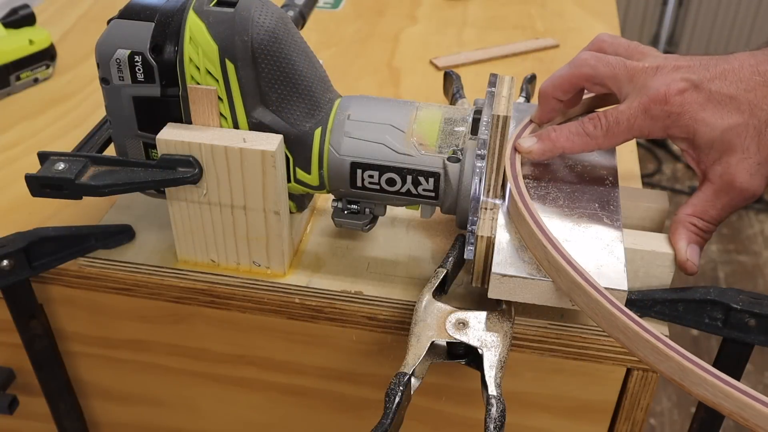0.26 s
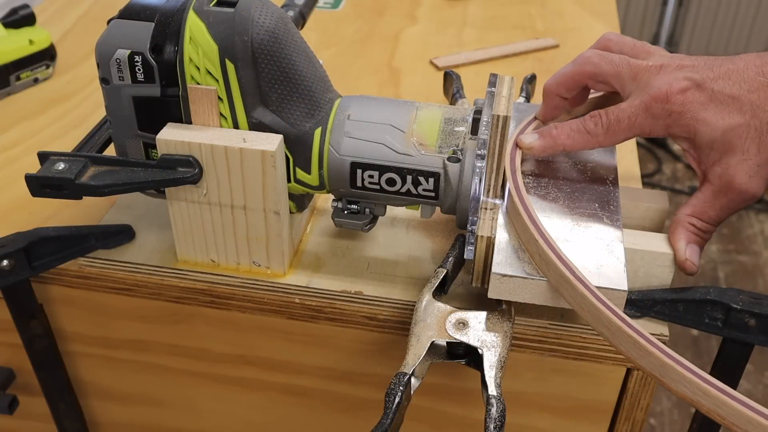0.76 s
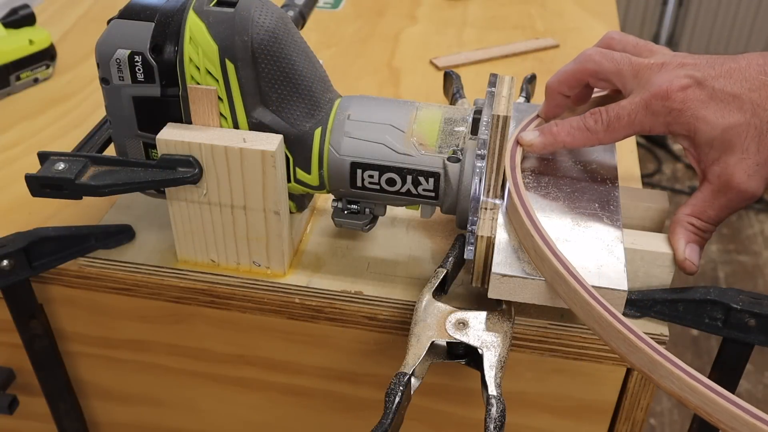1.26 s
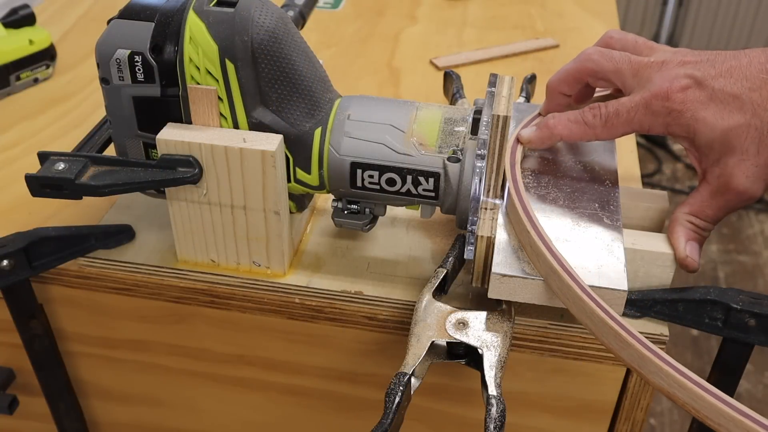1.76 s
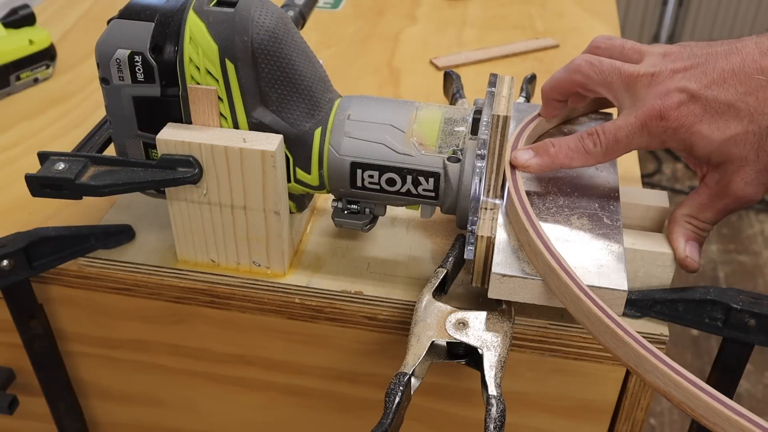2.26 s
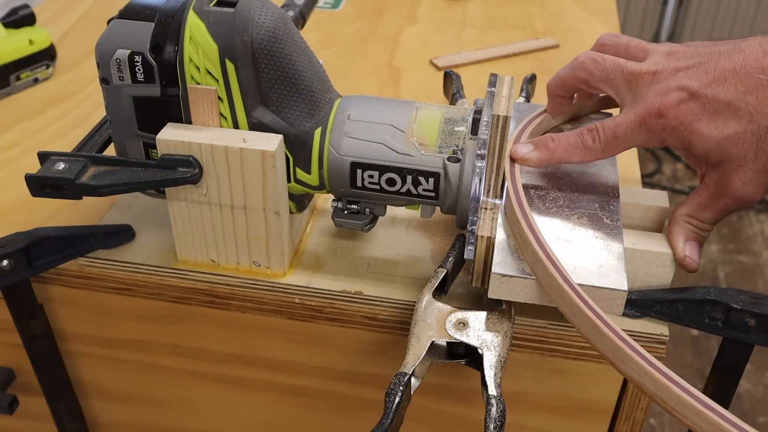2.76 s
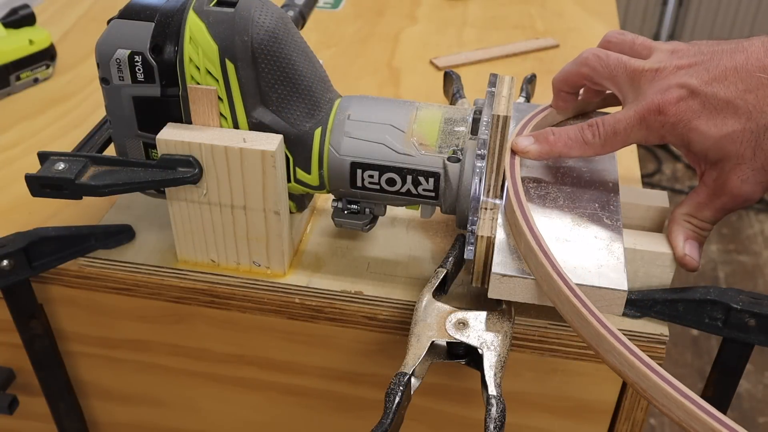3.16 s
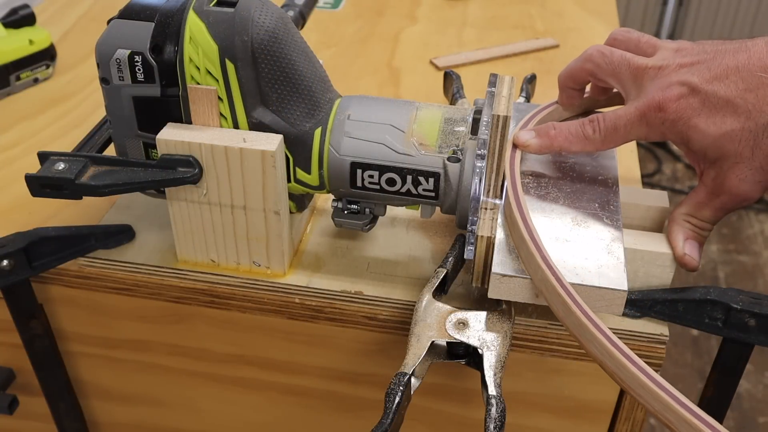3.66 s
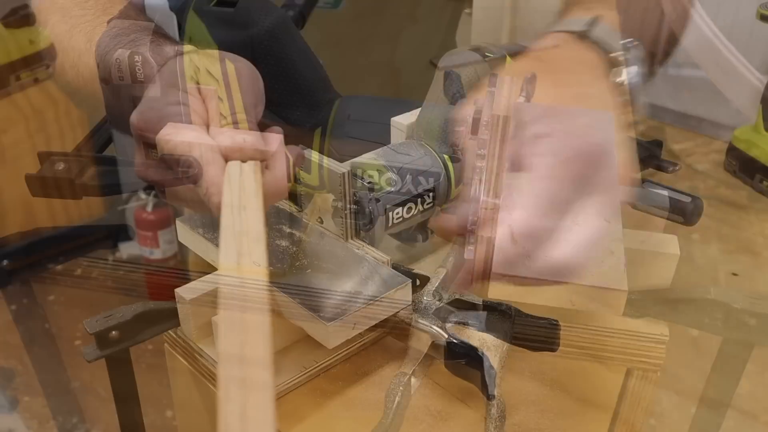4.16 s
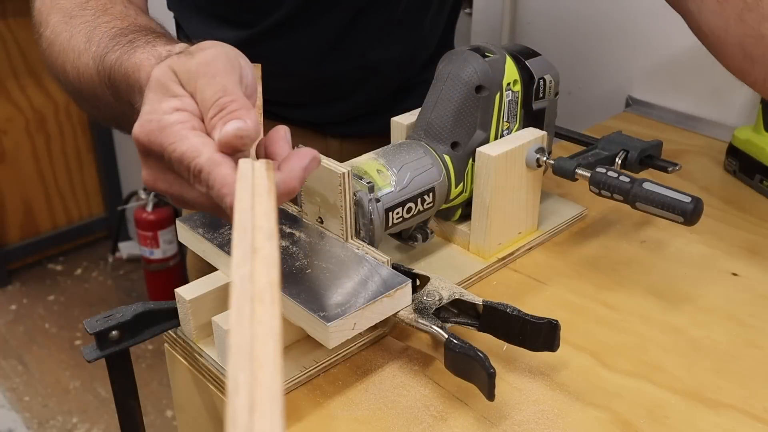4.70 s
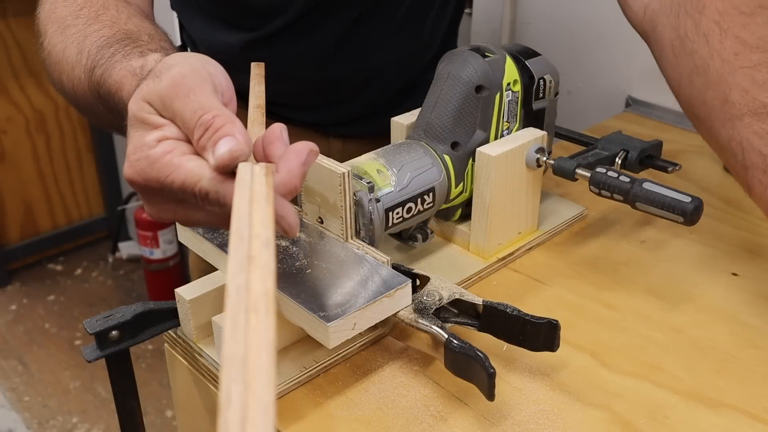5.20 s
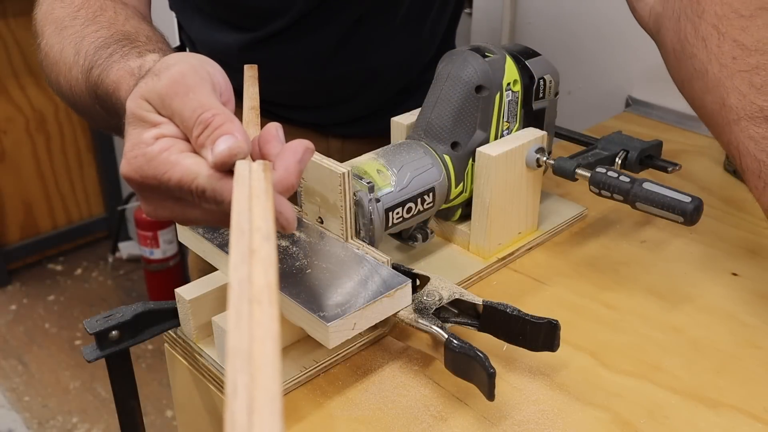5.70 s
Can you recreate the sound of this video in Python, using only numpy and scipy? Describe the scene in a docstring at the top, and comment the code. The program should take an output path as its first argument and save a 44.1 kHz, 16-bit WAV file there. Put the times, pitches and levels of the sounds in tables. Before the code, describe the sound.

High, steady whine and hum of a trim router rasping through wood, fading away to a quiet room where wooden strips briefly rub together.

```python
"""Trim router cutting a wooden strip.

A clamped cordless router runs at about 430 turns a second while a strip is fed past its bit. The bit strikes
once a turn, the motor whines at twelve times the speed, cooling air hisses from the vents. After the strip
leaves, the scene changes: the router fades out into quiet workshop air, where a hand slides two strips
together."""
import sys
import numpy as np
from scipy import signal
from scipy.fft import rfft, irfft, next_fast_len
from scipy.io import wavfile

SR = 44100
rng = np.random.default_rng(int(sys.argv[2]) if len(sys.argv) > 2 else 0)


def bounce(signal):
    """Save signal as a 16-bit WAV file at the path given by the first command-line argument."""
    frames = np.transpose(np.atleast_2d(signal))
    limited = np.clip(frames, -1, 1)
    pcm = np.round(limited * 32767).astype(np.int16)
    wavfile.write(sys.argv[1], SR, pcm)


N = 261947
T = np.arange(N) / SR
PULLS_PER_TURN = 12

# whine pitch, sagging as the strip is pressed in: (time [s], pitch [Hz])
WHINE_PITCH = [(0.03, 5145), (0.31, 5171), (0.8, 5154), (0.98, 5185), (1.61, 5146), (1.79, 5208),
               (2.17, 5226), (2.46, 5150), (2.91, 5148), (3.04, 5097), (3.1, 5141), (3.82, 5149),
               (4.09, 5240), (4.2, 5225)]
# force of the bit's blow, heard as the once-a-turn hum: (time [s], level [dB])
BLOW_FORCE = [(0.03, -22), (0.22, -25.5), (0.6, -22), (0.65, -25), (0.72, -23), (1.01, -24.5),
              (1.07, -23.5), (1.56, -22), (1.71, -27), (2.2, -27), (2.28, -20), (2.34, -24.5), (2.39, -21),
              (2.82, -23.5), (3.03, -20.5), (3.09, -22), (3.66, -23), (3.93, -25.5)]
# strip resonance, shifting as it bends, and depth of cut: (time [s], resonance [Hz], rasp level [dB])
STRIP_CUT = [(0.03, 2060, -41.5), (0.71, 2280, -42.5), (0.8, 2150, -36), (0.94, 2560, -39.5),
             (1.03, 2060, -41.5), (1.2, 2500, -35.5), (1.46, 2500, -39.5), (1.78, 1850, -51),
             (2.18, 2100, -60), (2.27, 1800, -34), (2.31, 2210, -54), (2.38, 1800, -37),
             (2.42, 2320, -43.5), (2.67, 2700, -40), (3.27, 1820, -51), (3.33, 2400, -52),
             (3.71, 2490, -46), (3.93, 1690, -38)]
# rush of air and motor tones: (time [s], level [dB])
RUSH_LEVEL = [(0.03, -40.5), (0.23, -39), (1.71, -40), (2.24, -38), (3.04, -41), (3.69, -41), (3.9, -42.5)]


def router(free_hz=436.5, loaded_hz=427, tear_load=0.41, cut_end_s=3.96, fade_s=(3.942, 4.375),
           hum_db=-0.35, idle_db=-31.5, rasp_db=-1.5, chips_db=-10, rush_db=3, air_db=1.55):
    """One shaft drives all parts; its sag in speed sets the load. Cutting stops as the strip leaves."""
    speed_hz = curves(WHINE_PITCH)[0] / PULLS_PER_TURN
    median_hz = np.median(speed_hz)
    angle = 2 * np.pi * np.cumsum(speed_hz) / SR + .005 * drift(32)
    load = np.clip((free_hz - speed_hz) / (free_hz - loaded_hz), 0, 1)
    in_wood = np.clip((cut_end_s - T) / 0.013 + .5, 0, 1)
    force_db, = curves(BLOW_FORCE)
    resonance_hz, bite_db = curves(STRIP_CUT)
    bite = undb(bite_db)
    rush = undb(rush_db + curves(RUSH_LEVEL)[0])
    hum_gain = in_wood * undb(hum_db + force_db) + (1 - in_wood) * undb(idle_db)
    running = hum_gain * tone(angle, 1, rough=0.076, waver_hz=6.7)
    running += whine(angle) + housing(angle, load)
    running += rush * (motor(angle, speed_hz) + undb(air_db) * cooling_air())
    tearing = bite * (undb(rasp_db) * rasp(angle, median_hz, resonance_hz) + undb(chips_db) * chips(angle))
    tearing += np.sqrt(bite * rush) * buzz(angle, median_hz)
    # under light load the bit knocks but hardly tears
    cutting = knock(angle, force_db) + np.tanh(load / tear_load) * tearing
    fade = np.interp(T, fade_s, (1, 0)) ** 1.08
    return fade * (running + in_wood * cutting + grabs(angle, median_hz))


# third harmonic of the hum: (time [s], level [dB])
THIRD_LEVEL = [(0.03, -38), (0.27, -45), (0.54, -40), (2.2, -40), (2.26, -31), (2.29, -35), (3.41, -40),
               (3.74, -39.5), (3.9, -48)]


def knock(angle, force_db):
    """The bit shoves the strip once a turn: harmonics 2 and 3, the second growing with the force."""
    second_db = -40.5 + 0.91 * (force_db - np.median(force_db))
    third_db = 0.6 + curves(THIRD_LEVEL)[0]
    return sum(undb(db) * tone(angle, order, rough=0.22, waver_hz=8, lag_rad=quadrature())
               for order, db in ((2, second_db), (3, third_db)))


def rasp(angle, shaft_hz, resonance_hz, width_hz=250, floor=.22):
    """The strip's resonance lifts the nearest of harmonics 4-6; the others stay faint."""
    orders = np.arange(4, 7)
    gains = np.array([k * (floor + 1 / (1 + ((k * shaft_hz - resonance_hz) / width_hz) ** 2))
                      for k in orders])
    gains /= np.linalg.norm(gains, axis=0)
    return sum(gain * tone(angle, k, rough=0.32, waver_hz=9, lag_rad=quadrature())
               for k, gain in zip(orders, gains))


# upper overtones of the blow: (frequency [Hz], level [dB])
BUZZ_SPECTRUM = [(3400, -13.5), (3900, -14), (4300, -16), (4700, -14), (5600, -21), (6000, -18.5),
                 (6450, -18), (8700, -16), (9900, -26), (12500, -31), (15500, -37)]


def buzz(angle, shaft_hz, grain_db=2.5, grain_hz=4):
    """One sharp blow a turn makes a comb of overtones that swell and sink as the grain passes."""
    out = 0
    for order in np.r_[8:12, 13:35]:  # 12 belongs to the whine
        grain = unit_rms(undb(grain_db * drift(grain_hz)))
        lag_rad = quadrature() + rng.standard_normal()
        overtone = tone(angle, order, rough=0.82, waver_hz=11, lag_rad=lag_rad)
        out += gain_at(order * shaft_hz, BUZZ_SPECTRUM) * grain * overtone
    return out


def chips(angle, sharpness=1.8, scatter_db=0.5, tilt_db_per_oct=-2.5):
    """Fibres tear in one uneven noise burst per turn."""
    bursts = np.exp(sharpness * (np.cos(angle) - 1)) * undb(scatter_db * drift(150))
    return colour(bursts * rng.standard_normal(N), AIR_SPECTRUM, tilt_db_per_oct=tilt_db_per_oct)


# the bit grabs a thick chip: (time [s], rise [s], fall [s], level [dB])
CHIP_GRABS = [(2.272, 0.04, 0.0088, -32.5), (3.025, 0.022, 0.016, -38), (3.945, 0.027, 0.0048, -38)]
# overtones of a grab: (frequency [Hz], level [dB])
GRAB_SPECTRUM = [(860, -9), (1300, 7), (1720, 5.5), (2150, 9), (3000, -4.5), (4500, -26), (8000, -17),
                 (9500, -19)]


def grabs(angle, shaft_hz, splinter_db=-9, snap_db=-12, snap_lead_s=0.0065, snap_s=.0035):
    """A thick chip hardens the blows: a splintery bark, with a fibre snapping just before its peak."""
    bark = sum(gain_at(k * shaft_hz, GRAB_SPECTRUM) * tone(angle, k, rough=0.62, waver_hz=60)
               for k in range(2, 23))
    bark = unit_rms(bark) + undb(splinter_db) * chips(angle, tilt_db_per_oct=1.5)
    snap = undb(snap_db) * colour(rng.standard_normal(N), AIR_SPECTRUM, tilt_db_per_oct=14)
    out = 0
    for at_s, rise_s, fall_s, db in CHIP_GRABS:
        out += undb(db) * swell(at_s, rise_s, fall_s) * bark
        out += undb(db) * swell(at_s - snap_lead_s, snap_s, snap_s) * snap
    return out


# motor whine: (time [s], level [dB])
WHINE_LEVEL = [(0.03, -38.5), (0.33, -40.5), (0.54, -36), (1.79, -41.5), (1.83, -46.5), (2.06, -40),
               (2.89, -39.5), (2.95, -47), (2.97, -40), (3.24, -42.5), (3.8, -39), (3.93, -45.5)]
# moments of heavy load that dip the whine: (time [s], depth [0-1])
WHINE_DIPS = [(1.48, .45), (2.61, 0.7), (2.755, 0.7), (3.04, .7), (3.17, .45), (3.27, 0.5), (3.35, 0.8),
              (3.45, 0.8)]


def whine(angle, gain_db=2.5, dip_s=0.011, sideband_db=-18):
    """The rotor's magnetic pull whines, dips briefly and grows a fluttering sideband when strong."""
    level = undb(gain_db + curves(WHINE_LEVEL)[0])
    dips = np.prod([1 - depth * swell(at_s, dip_s, dip_s) for at_s, depth in WHINE_DIPS], axis=0)
    share = undb(sideband_db) * (level / np.median(level)) ** 1.4
    sideband = share * tone(angle, PULLS_PER_TURN + 1, rough=0.97, waver_hz=22)
    pull = tone(angle, PULLS_PER_TURN, rough=0.15, waver_hz=12, lag_rad=np.pi / 2)
    return level * (dips * pull + sideband)


def housing(angle, load, base_db=-48, load_db=4, build_db_per_s=1.75, peak_s=2.66):
    """The housing sings at harmonic 7, near its resonance; louder under load and towards peak_s."""
    build_db = build_db_per_s * (peak_s - np.abs(T - peak_s))
    return undb(base_db + load_db * load + build_db) * tone(angle, 7, rough=0.41, waver_hz=12)


# tones of the turning parts: (order [x shaft speed], level [dB], slope with speed [dB/Hz])
MOTOR_TONES = [(3, -17.5, 2), (4, -16.5, 0.7), (9, -19, -1), (10, -18, 0.7), (14.13, -27, 2.5),
               (21, -24.5, 1.2), (24, -44, -1)]


def motor(angle, speed_hz):
    """Bearings and fan blades sing at fixed multiples of the speed; their levels shift with it."""
    extra_hz = speed_hz - np.median(speed_hz)
    return sum(undb(db + db_per_hz * extra_hz) * tone(angle, order, rough=0.25, waver_hz=9)
               for order, db, db_per_hz in MOTOR_TONES)


# air through fan and vents: (frequency [Hz], density [dB])
AIR_SPECTRUM = [(60, -29), (125, -23), (260, -12), (520, -1.5), (900, 4), (1500, -3), (2000, 0.5),
                (2400, -3), (4200, 0.5), (6600, -7), (8400, -6), (10300, -17), (12500, -17.5), (15500, -28)]
# housing resonances: (frequency [Hz], width [Hz], level [dB])
HOUSING_MODES = [(183, 13.7, -5), (3116, 256, 4.5), (3443, 200, 6.5)]


def cooling_air(flutter_db=0.97):
    """Cooling air rushes through the resonant housing."""
    hiss = colour(rng.standard_normal(N), AIR_SPECTRUM, HOUSING_MODES)
    return hiss * undb(flutter_db * drift(41))


# wood rubbing on wood: (time [s], rise [s], fall [s], level [dB], tilt [dB/octave])
RUBS = [(4.585, 0.027, .03, -55.5, 11), (5.457, 0.013, 0.014, -41, -1.5), (5.64, .012, .015, -63, 2)]
# friction noise: (frequency [Hz], density [dB])
RUB_SPECTRUM = [(300, -10), (700, -3), (1400, -3), (2200, -5), (3500, -5), (5500, -11), (8500, -16),
                (12000, -29), (15500, -32)]
# strip resonances: (frequency [Hz], width [Hz], level [dB])
STRIP_MODES = [(1060, 42, 11), (2520, 80, -2), (3100, 56, -5), (3450, 80, -2)]
# thin squeaks: (time [s], half length [s], pitch [Hz], level [dB])
RUB_SQUEAKS = [(4.59, 0.029, 3030, -59.5), (5.66, .025, 11300, -66), (5.77, .04, 11650, -72)]


def slides(grit_db=3, room_db=-9, room_t60_s=.4):
    """Short, gritty rubs ring the strips and squeak; the room adds a brief tail."""
    out = 0
    for at_s, rise_s, fall_s, db, tilt in RUBS:
        grit = rng.standard_normal(N) * undb(grit_db * drift(250))
        out += undb(db) * swell(at_s, rise_s, fall_s) * colour(grit, RUB_SPECTRUM, STRIP_MODES, tilt)
    for at_s, half_s, hz, db in RUB_SQUEAKS:
        out += undb(db) * swell(at_s, half_s, half_s) * tone(2 * np.pi * T, hz, rough=0.74, waver_hz=80)
    tail = rng.standard_normal(SR) * np.exp(-np.log(1000) * T[:SR] / room_t60_s)
    return out + undb(room_db) * signal.fftconvolve(out, tail / np.linalg.norm(tail))[:N]


# ventilation: (frequency [Hz], density [dB])
VENTILATION_SPECTRUM = [(15, -39), (25, -4.5), (64, -5.5), (183, -11), (274, -4), (433, -7.5), (495, -5),
                        (666, -5.5), (741, -7), (970, -10), (1270, -13), (1660, -15.5), (1900, -18.5),
                        (2560, -22.5), (15500, -28.5)]
# mains hum: (frequency [Hz], level [dB])
MAINS_HUM = [(60, -73), (242, -69.5)]


def workshop(noise_db=-51.2, drift_db=0.96, fade_in_s=(3.94, 4.16)):
    """Ventilation noise and faint mains hum of the workshop, faded in as the scene changes."""
    noise = undb(noise_db + drift_db * drift(15)) * colour(rng.standard_normal(N), VENTILATION_SPECTRUM)
    hum = sum(undb(db) * tone(2 * np.pi * T, hz, rough=0.25, waver_hz=2.7) for hz, db in MAINS_HUM)
    return (noise + hum) * np.interp(T, fade_in_s, (0, 1))


def tone(angle, order, rough, waver_hz, lag_rad=0):
    """Sinusoid at order times the angle, wavering in strength and phase; rms 1."""
    phase = order * angle + lag_rad
    wave = (1 + rough * drift(waver_hz)) * np.cos(phase) + rough * drift(waver_hz) * np.sin(phase)
    return wave / np.sqrt(.5 + rough ** 2)


def quadrature():
    """A quarter cycle early or late, so cutting and motor tones add in power."""
    return rng.choice([-1, 1]) * np.pi / 2


def drift(rate_hz):
    """Smooth random drift, rms 1."""
    steps = rng.standard_normal(8192)  # 1 ms each
    hz = np.fft.rfftfreq(len(steps), 1 / 1000)
    smooth = unit_rms(irfft(rfft(steps) / (1 + (hz / rate_hz) ** 2)))
    return np.interp(T * 1000, np.arange(len(steps)), smooth)


def swell(peak_s, rise_s, fall_s):
    """Two-sided Gaussian envelope."""
    return np.exp(-.5 * ((T - peak_s) / np.where(T < peak_s, rise_s, fall_s)) ** 2)


def colour(x, spectrum, modes=(), tilt_db_per_oct=0):
    """Filter by a broad spectrum, resonances and a tilt; rms 1."""
    size = next_fast_len(N)
    hz = np.maximum(np.fft.rfftfreq(size, 1 / SR), 1)
    power = gain_at(hz, spectrum) ** 2
    for mode_hz, width_hz, db in modes:
        power += undb(db) ** 2 / (1 + ((hz - mode_hz) / width_hz) ** 2) ** 2
    gain = np.sqrt(power) * undb(tilt_db_per_oct * np.log2(hz))
    return unit_rms(irfft(rfft(x, size) * gain, size)[:N])


def gain_at(hz, spectrum):
    """Gain of a spectrum, interpolated in log frequency."""
    points_hz, db = np.transpose(spectrum)
    return undb(np.interp(np.log(np.maximum(hz, 1)), np.log(points_hz), db))


def curves(table):
    """Each value column as a curve in time."""
    times_s, *columns = np.transpose(table)
    return [np.interp(T, times_s, column) for column in columns]


def undb(db):
    """Decibels to gain."""
    return np.exp(np.asarray(db) * np.log(10) / 20)


def unit_rms(x):
    """Scale to rms 1."""
    return x / np.sqrt(np.mean(np.abs(x) ** 2))


def scene():
    """Router, then sliding strips and room; mono."""
    return (router() + slides() + workshop())[None]


def record(dry, top_hz=15700):
    """Steep low-pass."""
    return signal.sosfiltfilt(signal.ellip(10, .05, 60, top_hz, fs=SR, output="sos"), dry)


dry = scene()
out = record(dry)
bounce(out)
```